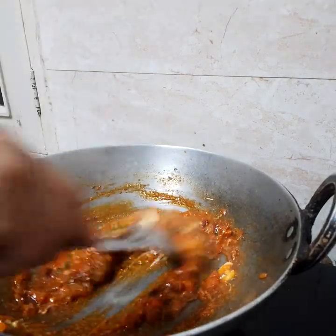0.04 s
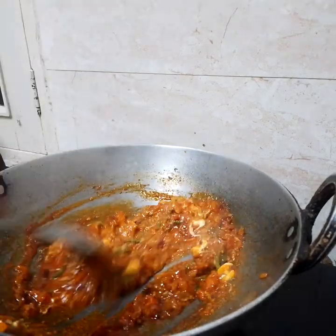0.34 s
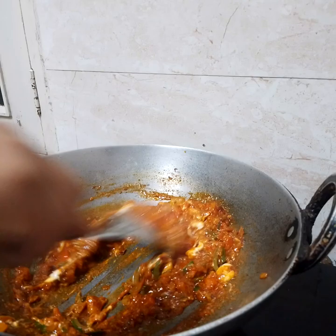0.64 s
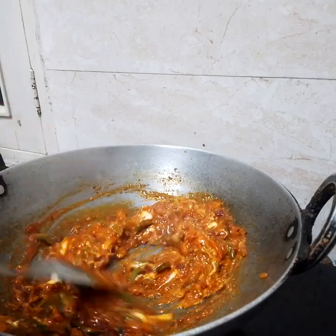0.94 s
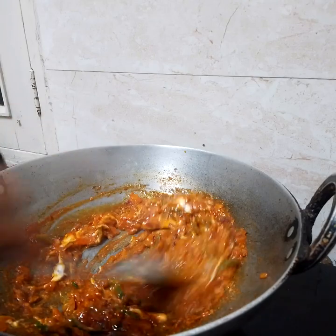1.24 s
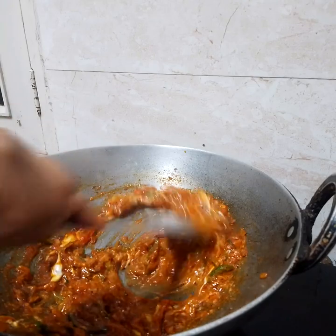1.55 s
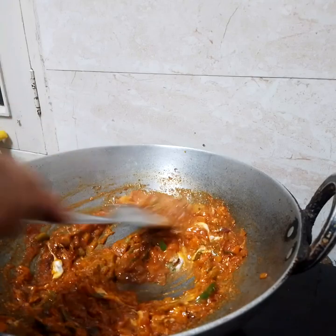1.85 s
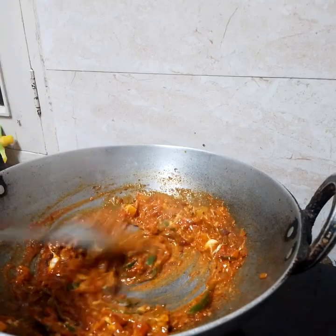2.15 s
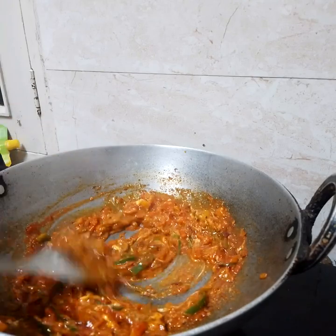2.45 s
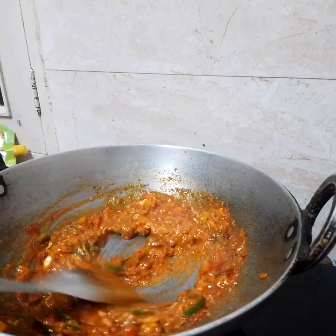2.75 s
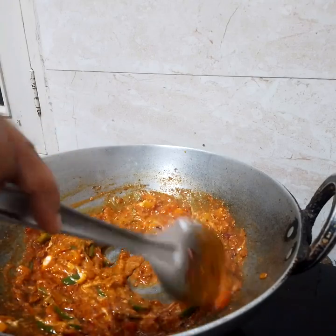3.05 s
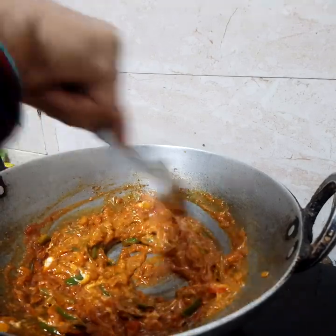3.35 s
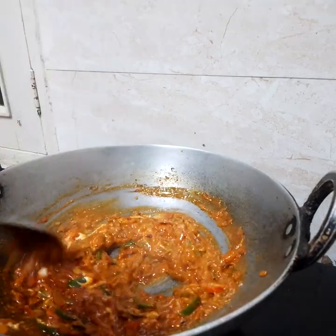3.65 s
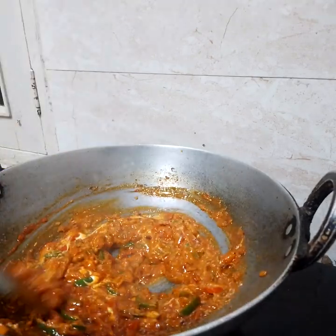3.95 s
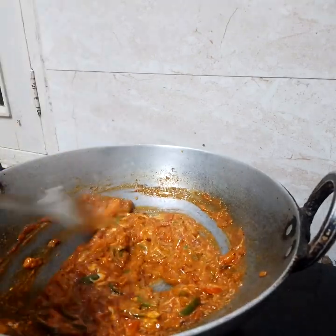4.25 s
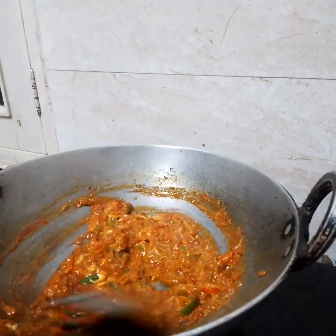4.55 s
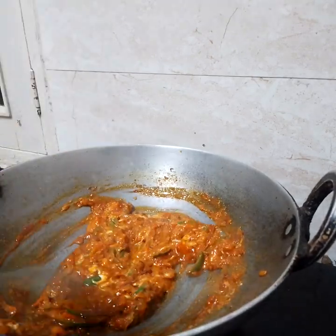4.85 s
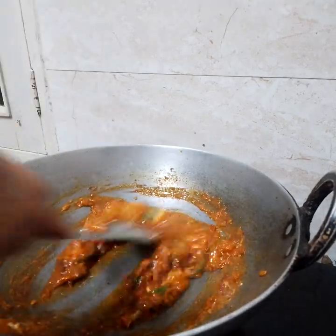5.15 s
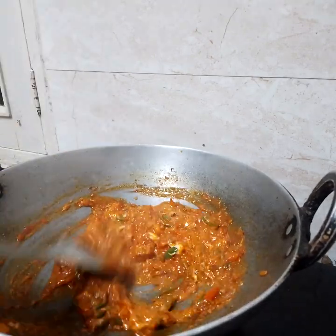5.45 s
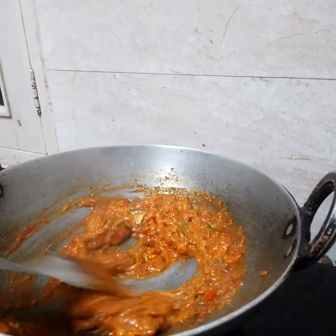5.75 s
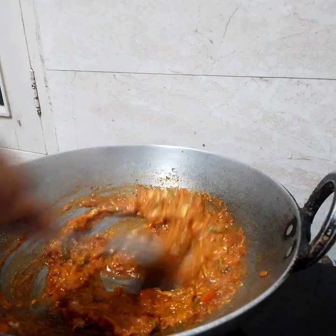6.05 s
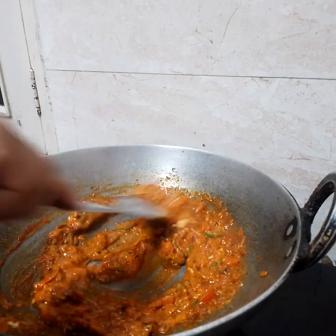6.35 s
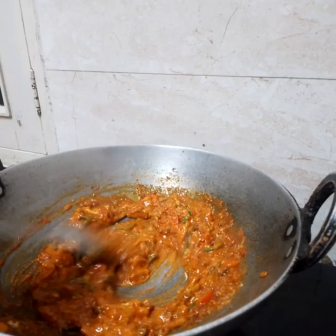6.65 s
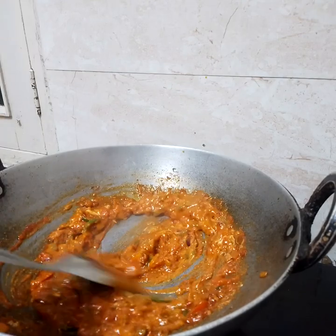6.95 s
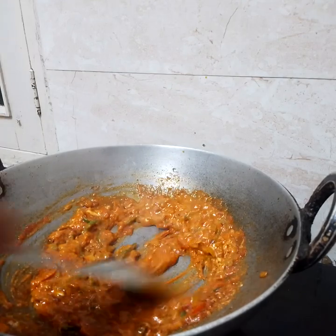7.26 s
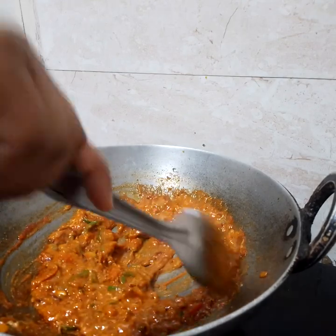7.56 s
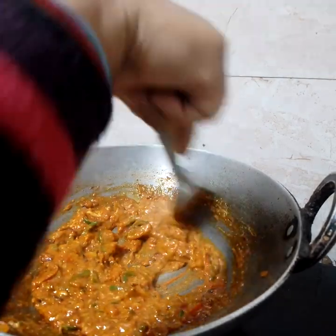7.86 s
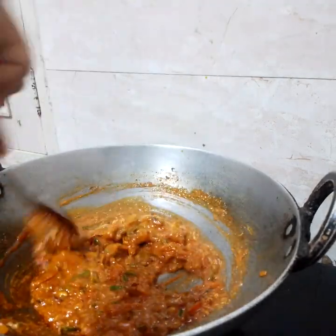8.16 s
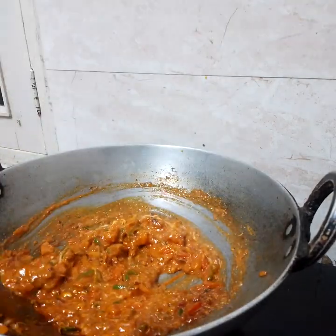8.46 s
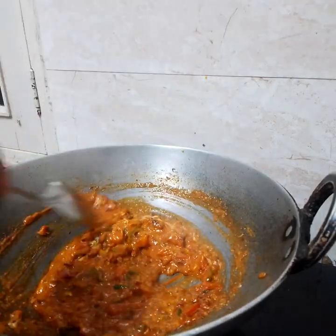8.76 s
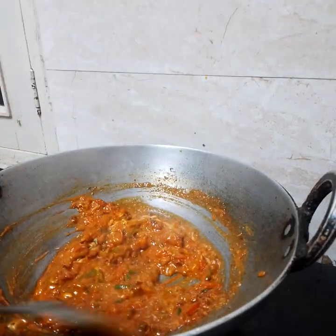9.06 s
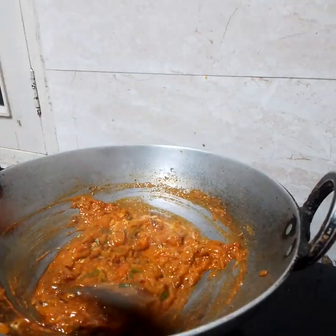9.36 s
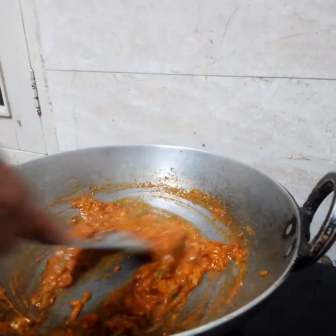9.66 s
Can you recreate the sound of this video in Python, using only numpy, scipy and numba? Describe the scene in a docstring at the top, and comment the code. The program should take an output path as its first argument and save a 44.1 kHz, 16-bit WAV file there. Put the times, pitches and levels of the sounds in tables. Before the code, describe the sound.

In a small tiled kitchen, a steel spoon rasps again and again across a metal pan, heard from close by. Thick sauce dulls the metal's ring and squelches softly as it folds over. Light clinks and brief judders break up the quick, uneven scraping, and the loudest knocks come late, ringing briefly while the stirring carries on. The walls echo slightly, and an appliance hums very faintly underneath.

```python
"""In a small tiled kitchen, a steel spoon stirs thick sauce in a metal pan close by.
Each stroke is a stream of tiny slips: the spoon's edge rasps, the pan rings, muffled by the sauce,
and the sauce squelches behind the spoon. Now and then the spoon knocks on the pan or judders across it,
and a knock or rub sets one note ringing. The walls echo, and a faint appliance hum lies underneath."""
import sys
import numpy as np
from scipy import signal
from scipy.fft import rfft, irfft
from scipy.io import wavfile
from scipy.ndimage import map_coordinates
from numba import njit

SR = 44100
rng = np.random.default_rng(int(sys.argv[2]) if len(sys.argv) > 2 else 0)


def store_wav(level_fs):
    """Save 16-bit WAV to argv[1]."""
    pcm = np.round(np.clip(np.atleast_2d(level_fs), -1, 1) * 32767)
    wavfile.write(sys.argv[1], SR, pcm.T.astype(np.int16))


N = 437472
TIME = np.arange(N) / SR
HAND_TIME = np.arange(0, N / SR, .001)  # a coarser clock for the hand's movements
FREQ = np.maximum(np.fft.rfftfreq(4096, 1 / SR), 1)

# Table levels are relative: the functions below turn them up or down.
# tone of the kitchen air: pitch_hz, level_db
AIR_TONE = [(20, 14), (55, -13), (100, 2), (170, -16), (400, 1), (1000, -6.5), (3000, -15), (7000, -3),
            (15000, -19)]
# notes of the appliance hum: pitch_hz, level_db
HUM_NOTES = [(80.7, -94), (118.4, -99)]
# the spoon knocks on the pan: start_s, edge_db, body_db, thud_db, ring_db
KNOCKS = [(0.023, -53, -69, -74, -85), (0.047, -49, -73, -85, -90), (0.572, -59, -55, -49, -85),
          (0.611, -41, -34.5, -67, -64), (1.248, -39, -49, -56, -76), (1.588, -26.5, -35, -69, -60),
          (1.681, -32, -41, -66, -70), (2.005, -48, -40.5, -71, -66), (2.263, -42.5, -40, -75, -67),
          (2.342, -43, -47, -49, -76), (2.708, -37.5, -64, -54, -63), (3.037, -22, -52, -52, -68),
          (3.053, -21.5, -34, -36.5, -65), (3.157, -39, -23, -68, -38), (3.276, -22, -30, -44, -38),
          (3.377, -40, -66, -51, -73), (3.462, -45, -36, -44, -68), (4.542, -76, -38, -112, -65),
          (4.608, -31.5, -35, -77, -45.5), (4.855, -32, -31, -63, -65), (5.255, -40, -34, -47, -47),
          (5.743, -32, -43, -56, -61), (6.041, -45, -49, -75, -55.5), (6.111, -30, -39, -43, -62),
          (6.525, -40, -54, -71, -73), (6.837, -34, -63, -70, -49), (7.209, -53, -32.5, -35, -42),
          (7.681, -32.5, -37, -58, -67), (7.738, -45, -24.5, -59, -44), (7.773, -42, -21, -44, -48),
          (8.031, -15, -24.5, -41, -53), (8.040, -11.5, -19.5, -43, -33), (8.441, -15.5, -19.5, -38, -50),
          (8.991, -32, -25, -64, -33), (9.116, -33, -30.5, -71, -51), (9.266, -18, -18, -39, -50),
          (9.685, -44, -34, -35, -54), (9.786, -27.5, -65, -71, -63)]
# overall tone of the pan: pitch_hz, left_db, right_db
PAN_TONE = [(173, -52, -42.5), (236, -23.5, -20.5), (514, -20.5, -19.5), (632, -8, 0), (787, -3.5, -3.5),
            (1240, -2.5, 1.5), (2260, 1.5, 2), (3780, 0, -1), (4600, 1, 0.5), (6200, 7, 4), (7270, 6, 2),
            (8690, -5, 2), (8950, -1, -4.5), (11090, -21.5, -20.5), (13200, -16, -19.5),
            (15600, -56, -40.5)]
# muffled pan notes that stand out from that tone: pitch_hz, width_hz, left_db, right_db
PAN_NOTES = [(293.5, 5, 16, 10), (378, 24, 10, 6), (507, 17.4, -6.5, 4), (708, 9.9, -2, -0.5),
             (1467, 270, -2, -7), (3130, 210, -7.5, -17), (4010, 180, -2, -7), (4360, 92, -0.5, -24),
             (5050, 330, -16, -3.5), (6510, 160, -7, -10), (6750, 430, 0, -20), (7420, 170, 0, 0),
             (8330, 190, -1, -10), (8570, 71, -15, -10.5), (10050, 1030, -3, 6), (11070, 150, 8, 12.5)]
# notes that ring on when the spoon bounces clear: pitch_hz, level_db, fade_s (time to drop 60 dB)
TAP_NOTES = [(905, -2, 0.3), (1084, 6.5, 0.47), (2152, 11, 0.053), (2340, 19, 0.19), (3050, 16, 0.2),
             (3206, 1, 0.17), (4050, 5, .26), (4770, -12, .3), (5830, -3, 0.146), (6230, -8, 0.49),
             (6800, -5, 0.38)]
# notes of the spoon on bare metal: pitch_hz, width_hz, level_db
BARE_NOTES = [(990, 87, -3), (1500, 70, -11), (2120, 57, -4), (2440, 96, 1.5), (2860, 62, -7),
              (3250, 170, 8.5), (4170, 390, 0), (4500, 260, 3), (6260, 110, 8), (7700, 780, -2.5)]
# the spoon skims bare metal: start_s, end_s, level_db
SKIMS = [(2.705, 2.775, -53.5), (2.769, 2.897, -39), (7.212, 7.312, -55), (7.27, 7.364, -45.5),
         (7.336, 7.41, -50)]
# spoon strokes; the hollow is the gap under the spoon, and its pitch is given at full pressure:
# start_s, rise_s, hold_s, edge_db, body_db, sauce_db, hollow_hz, glide_octaves_per_s
STROKES = [(0.185, 0.045, 0.005, -24.5, -38.5, -54, 1690, -8),
           (0.607, 0.057, 0.0042, -28.5, -38, -69, 1970, -8),
           (0.942, 0.092, 0.013, -29.5, -40, -57.5, 2220, -5),
           (1.215, 0.042, 0.0049, -49, -57, -70, 1110, -17),
           (1.341, 0.076, 0.04, -29, -35.5, -63.5, 1950, -17),
           (1.58, 0.012, 0.0052, -33, -55, -66, 1840, -4),
           (1.681, 0.081, 0.049, -27, -34, -62.5, 2200, -7.5),
           (2.037, 0.11, 0.0094, -29.5, -37.5, -68, 1690, -3.5),
           (2.41, 0.061, 0.0047, -32, -35, -62, 2260, -3.5),
           (2.788, 0.059, 0.13, -32, -47, -68, 2950, -9.5), (3.02, 0.022, 0.0052, -32.5, -32, -53, 1200, 4),
           (3.094, 0.081, 0.076, -28.5, -32, -52.5, 1590, -3),
           (3.461, 0.11, 0.032, -43.5, -35.5, -80, 865, 6),
           (3.578, 0.11, 0.057, -25.5, -37.5, -54.5, 1680, -4.5),
           (3.849, 0.057, 0.1, -25.5, -33, -55.5, 2490, 2),
           (4.104, 0.14, 0.017, -21.5, -30.5, -52.5, 2070, 4),
           (4.602, 0.092, 0.0099, -27, -40, -51.5, 1820, 2),
           (4.85, 0.0096, 0.0065, -40.5, -47.5, -70, 810, -15),
           (5.036, 0.069, 0.052, -30, -33.5, -58.5, 2060, -1.5),
           (5.251, 0.028, 0.059, -30, -50, -69, 1580, -12),
           (5.431, 0.079, 0.03, -25, -31.5, -61.5, 2190, -14),
           (5.82, 0.047, 0.005, -34.5, -44, -56, 1660, -9),
           (5.896, 0.04, 0.015, -40.5, -39, -65, 1080, -17),
           (6.098, 0.024, 0.018, -37.5, -50, -64.5, 1750, 3),
           (6.211, 0.084, 0.048, -26, -31, -72, 1840, -8.5),
           (6.366, 0.039, 0.021, -42, -39, -77, 800.0, -11),
           (6.496, 0.036, 0.15, -63.5, -55.5, -63, 700.0, 7.5),
           (6.63, 0.069, 0.0055, -28, -32.5, -61.5, 2090, -3),
           (6.828, 0.0093, 0.0044, -35, -53, -79, 1290, -14),
           (6.982, 0.045, 0.025, -29, -35, -57, 2340, -5),
           (7.348, 0.036, 0.16, -41, -53.5, -72, 2730, -5.5), (7.58, 0.08, 0.081, -53, -73, -76, 1960, 0),
           (7.671, 0.067, 0.052, -30, -32.5, -52.5, 1300, -2),
           (8.028, 0.0027, 0.042, -27, -35, -55, 2720, -3),
           (8.09, 0.027, 0.086, -37.5, -36.5, -63, 2100, -8),
           (8.17, 0.023, 0.082, -22.5, -30.5, -61.5, 1940, -1.5),
           (8.372, 0.024, 0.11, -26.5, -31.5, -54, 2660, -4),
           (8.543, 0.025, 0.25, -36, -36, -67.5, 1800, 1), (8.683, 0.1, 0.038, -22.5, -34, -53, 1950, -3.5),
           (8.896, 0.035, 0.13, -33.5, -39.5, -55, 2196, 0),
           (9.141, 0.033, 0.11, -21.5, -37.5, -54.5, 2250, -2),
           (9.339, 0.042, 0.13, -31.5, -48, -67, 1020, 0.5),
           (9.55, 0.082, 0.063, -25.5, -34.5, -53.5, 2700, -9.5),
           (9.838, 0.019, 0.042, -33.5, -41, -59, 710, -10)]
# the edge bites through to the metal: centre_s, length_s, low_pitch_hz, low_db, middle_db, high_db
BITES = [(0.244, 0.042, 1550, -38, -66, -30), (0.654, 0.043, 1470, -45, -58, -38),
         (1.019, 0.12, 1410, -36, -28.5, -32), (1.406, 0.11, 1420, -32.5, -36, -31),
         (1.756, 0.08, 1460, -44, -45, -33.5), (2.134, 0.072, 1440, -37, -46, -33),
         (2.465, 0.13, 1530, -37.5, -58, -38), (3.205, 0.13, 1460, -39, -52, -44),
         (3.672, 0.36, 1510, -36, -39, -48), (3.874, 0.072, 1380, -38, -35, -50),
         (3.95, 0.23, 1410, -34.5, -41, -55), (4.264, 0.041, 1470, -53, -54, -36),
         (5.1, 0.072, 1430, -60, -34, -35.5), (5.476, 0.059, 1440, -42, -31, -45),
         (5.549, 0.07, 1530, -31, -43, -55), (6.302, 0.091, 1580, -37, -42, -43),
         (6.686, 0.12, 1700, -39, -40, -31), (7.052, 0.076, 1530, -46, -42, -35.5),
         (7.755, 0.074, 1480, -35, -58, -53), (8.236, 0.13, 1490, -31, -46, -36),
         (8.415, 0.16, 1430, -35, -35, -48), (8.797, 0.075, 1600, -50, -52, -49),
         (9.23, 0.053, 1460, -50, -49, -37), (9.27, 0.062, 1450, -30, -54, -30),
         (9.647, 0.059, 1720, -49, -49, -27)]
# a bite's low, middle and high note: width_hz
BITE_WIDTHS = [240, 380, 640]
# the spoon judders across the pan: start_s, end_s, level_db
JUDDERS = [(0.32, 0.5, -64), (1.044, 1.206, -67.5), (1.763, 1.94, -69), (2.498, 2.684, -63),
           (3.277, 3.386, -67.5), (3.943, 4.14, -59.5), (4.202, 4.314, -59.5), (4.735, 4.887, -57.5),
           (5.473, 5.584, -71), (8.777, 8.89, -61), (9.223, 9.46, -61.5), (9.66, 9.86, -57)]
# tone of the judder: pitch_hz, level_db
JUDDER_TONE = [(40, -38), (85, -4.5), (120, -4), (165, -18), (240, 0.5), (330, 2), (500, -41), (1500, -44)]
# the sauce folds over: start_s, length_s, level_db
FOLDS = [(0.567, 0.15, -57.5), (0.703, 0.019, -63), (2.932, 0.15, -59), (3.362, 0.023, -64),
         (3.483, 0.062, -53.5), (4.53, 0.035, -65.5), (4.718, 0.12, -52.5), (5.258, 0.041, -54.5),
         (5.908, 0.08, -54), (6.386, 0.024, -55), (6.844, 0.015, -62), (7.028, 0.078, -51.5),
         (7.645, 0.052, -54.5), (8.535, 0.014, -58), (8.768, 0.032, -46), (9.254, 0.083, -45),
         (9.68, 0.15, -52)]
# a knock or rub sets one note of the pan ringing briefly: start_s, drive_s, pitch_hz, level_db
PAN_RINGS = [(0.573, 0.063, 365, -49), (0.715, 0.034, 727, -53), (1.09, 0.079, 714, -69),
             (3.032, 0.012, 1144, -31.5), (3.93, 0.16, 1488, -49), (3.97, 0.09, 2616, -44),
             (4.31, 0.16, 685, -61.5), (4.606, 0.006, 2390, -42), (4.87, 0.17, 703, -63.5),
             (5.26, 0.071, 726, -51), (6.395, 0.05, 681, -47), (6.47, 0.048, 730, -62),
             (6.595, 0.017, 1066, -54.5), (6.634, 0.0067, 2420, -37), (8.029, 0.041, 371, -45),
             (8.029, 0.0059, 2846, -26), (9.135, 0.13, 507, -50), (9.845, 0.11, 790, -47)]


def undb(db):
    """Turn decibels into a gain, the number a sound is multiplied by."""
    return 10 ** (np.asarray(db) / 20)


def unit(x):
    """Scale a signal to an average strength (rms) of 1."""
    return x / np.sqrt(np.mean(x ** 2))


def wander(rate):
    """A smooth random drift, about 1 in size, that turns about `rate` times a second."""
    points = signal.resample(rng.standard_normal(4096), 32768)
    return np.interp(TIME * rate * 8, np.arange(len(points)), points)


def tone_curve(table, column=1):
    """Read one level column of a tone table as a gain at each pitch in FREQ."""
    table = np.array(table)
    return undb(np.interp(np.log(FREQ), np.log(table[:, 0]), table[:, column]))


def apply_tone(x, curve):
    """Filter a sound with a tone curve."""
    cepstrum = irfft(np.log(curve + 1e-6))
    half = len(cepstrum) // 2
    cepstrum[1:half] *= 2  # these two lines put all ringing after a hit, never before it
    cepstrum[half + 1:] = 0
    return signal.oaconvolve(x, irfft(np.exp(rfft(cepstrum))))[:N]


@njit
def resonance(x, hz, width):
    """A filter with a moving pitch: row 0 keeps the sound near `hz`, row 1 the sound above it."""
    out, band_state, low_state = np.empty((2, len(x))), 0., 0.
    for i in range(len(x)):
        step, damping = np.tan(np.pi * hz[i] / SR), width[i] / hz[i]
        band = (band_state + step * (x[i] - low_state)) / (1 + step * (step + damping))
        out[0, i] = damping * band
        out[1, i] = x[i] - damping * band - low_state - step * band
        band_state, low_state = 2 * band - band_state, low_state + 2 * step * band
    return out


def slips(rate, spread_db):
    """Rubbing as tiny random clicks of uneven size, about `rate` a second."""
    size = undb(spread_db * np.clip(rng.standard_normal(N), -2, 2))
    return unit((rng.random(N) < rate / SR) * size * rng.choice([-1, 1], N))


def arch(start, end):
    """A rounded swell from 0 to 1 and back between two times."""
    return np.sqrt(np.sin(np.pi * np.clip((TIME - start) / (end - start), 0, 1)).clip(0))


def together(gains, lag_s=0):
    """Add the power of overlapping pushes, giving one gain per sample."""
    return np.interp(TIME - lag_s, HAND_TIME, np.linalg.norm(gains, axis=0))


def air_and_hum():
    """Still kitchen air hisses softly, and an appliance gives a low, slightly wavering hum."""
    shared, *sides = [unit(apply_tone(rng.standard_normal(N), tone_curve(AIR_TONE))) for _ in range(3)]
    hum = sum(undb(db + wander(1.5)) * np.sin(2 * np.pi * hz * TIME) for hz, db in HUM_NOTES)
    return undb(-78) * (1.5 * shared + 2.0 * np.array(sides)) + np.sqrt(2) * hum


def knocks(chatter=0.046, chatter_s=0.0096):
    """Each knock is a sharp push and a brief chatter of steel on metal; rows are edge, body and thud."""
    out = np.zeros((3, N + SR))
    age = np.arange(SR // 40) / SR
    for start_s, *levels, _ in KNOCKS:
        push = chatter * rng.standard_normal(len(age)) * np.exp(-age / chatter_s)
        push[0] += .5
        push *= np.sqrt(SR / 200 / np.sum(push ** 2))  # as much energy as 5 ms at strength 1
        start = int(start_s * SR)
        out[:, start:start + len(age)] += undb(levels)[:, None] * push
    return out[:, :N]


def pan(edge, body, sauce, edge_hz=2700, body_hz=620, sauce_hz=850, wander_db=4):
    """The pan shapes all three pushes; its notes grow and shrink as the spoon touches other spots."""
    below_edge = 1 / (1 + (FREQ / edge_hz) ** 8)
    below_sauce = 1 / (1 + (FREQ / sauce_hz) ** 8)
    middle = below_edge / (1 + (body_hz / FREQ) ** 8)
    bands = np.sqrt([1 - below_edge, middle, below_sauce])  # edge high, body in the middle, sauce low
    sides = np.array([tone_curve(PAN_TONE, column=1), tone_curve(PAN_TONE, column=2)])
    broad = np.zeros((2, N))
    for push, band in zip((edge, body, sauce), bands):
        broad += [apply_tone(push, curve) for curve in unit(sides * band)]
    out = broad.copy()
    for hz, width, left_db, right_db in PAN_NOTES:
        ring = signal.lfilter(*signal.iirpeak(hz, hz / width, fs=SR), broad)
        out += ring * undb([[left_db], [right_db]]) * undb(wander_db * wander(5))
    return out


def taps(gain_db=-2, scatter_db=3):
    """After a knock the metal rings on; each spot favours different notes."""
    out = np.zeros((2, N + SR))
    age = np.arange(SR // 3) / SR
    hz, db, fade_s = np.array(TAP_NOTES).T[:, :, None]
    notes = np.sin(2 * np.pi * hz * age) * undb(db - 60 * age / fade_s)
    for start_s, *_, ring_db in KNOCKS:
        strength, flip = rng.standard_normal((2, 2, len(hz)))
        ring = (undb(scatter_db * strength) * np.sign(flip)) @ notes
        start = int(start_s * SR)
        out[:, start:start + len(age)] += undb(ring_db + gain_db) * ring / np.std(ring[:, :SR // 200])
    return out[:, :N]


def bare_metal(skim_db=6, clink_db=17, right_lag_s=0.00008):
    """Knocks clink and skims scrape on bare metal, sounding a few strong notes."""
    swell = sum(undb(db) * arch(start, end) for start, end, db in SKIMS)
    push = undb(skim_db) * slips(rate=3300, spread_db=3) * swell
    for start_s, *_, ring_db in KNOCKS:
        push[int(start_s * SR)] += undb(ring_db + clink_db) * np.sqrt(SR / 200)
    out = np.zeros(N)
    for hz, width, db in BARE_NOTES:
        band = signal.iirpeak(hz, hz / width / 2, fs=SR)
        out += undb(db) * signal.lfilter(*band, signal.lfilter(*band, push))
    return np.array([out, np.interp(TIME - right_lag_s, TIME, out)])


def echoes(fade_s, treble_fade_s, bass_hz=620, treble_hz=3500):
    """A dense tail of echoes that drops 60 dB in the fade time; left and right share the bass."""
    def keep(x, kind, hz):
        return signal.sosfilt(signal.butter(3, hz, kind, fs=SR, output="sos"), x)

    age = np.arange(SR // 2) / SR
    noise = rng.standard_normal((3, len(age)))
    noise = keep(noise[0], "low", bass_hz) + keep(noise[1:], "high", bass_hz)
    tail = keep(noise, "low", treble_hz) * undb(-60 * age / fade_s)
    tail += keep(noise, "high", treble_hz) * undb(-60 * age / treble_fade_s)
    return unit(tail) / np.sqrt(len(age))


def kitchen(x, direct_db=-7, bowl_db=-4, room_db=-7, lag_s=0.00021, spots=5):
    """The pan's bowl and the tiled walls echo differently from each spot that the spoon passes."""
    lag = lag_s * SR * wander(5) / 2  # the direct sound shifts between left and right
    direct = [map_coordinates(side, [np.arange(N) + sign * lag]) for side, sign in zip(x, (1, -1))]
    nearness = np.exp([wander(9) for _ in range(spots)])
    out = undb(direct_db) * np.array(direct)
    for share in nearness / np.linalg.norm(nearness, axis=0):
        bowl = undb(bowl_db) * echoes(fade_s=0.024, treble_fade_s=0.031)
        walls = undb(room_db) * echoes(fade_s=0.35, treble_fade_s=0.3)
        out += signal.oaconvolve(x * share, bowl + walls, axes=1)[:, :N]
    return out


def pressure(start, rise, hold, curve=1.4, touch_share=0.15, touch_s=0.0034):
    """One push lands, presses harder, eases while held, then lifts and leaves a faint wet drag."""
    ease_db_per_s, lift_db_per_s, drag_db_per_s, drag_db = 14.5, 340, 100, -23
    age = HAND_TIME - start
    landing = touch_share * np.clip(age / touch_s, 0, 1)
    pressing = (1 - touch_share) * np.clip(age / rise, 0, 1) ** curve
    easing = undb(-ease_db_per_s * np.clip(age - rise, 0, hold))
    lifted_s = np.maximum(age - rise - hold, 0)
    leaving = undb(-lift_db_per_s * lifted_s) + undb(drag_db - drag_db_per_s * lifted_s)
    return (landing + pressing) * easing * leaving


def strokes(lowest_hz=630, highest_hz=2700):
    """The hand's pushes set the gains of edge, pan body and sauce, and the pitch of the hollow."""
    edge, body, sauce, octaves = [], [], [], []
    for start, rise, hold, edge_db, body_db, sauce_db, hollow_hz, glide in STROKES:
        push = pressure(start, rise, hold)
        edge.append(push * undb(edge_db))
        body.append(pressure(start, rise, hold, curve=1.6) * undb(body_db))  # needs a harder push
        sauce.append(push * undb(sauce_db))
        # the hollow opens during most strokes, so its pitch falls
        octaves.append(np.log2(hollow_hz) + glide * (HAND_TIME - start - rise))
    pitches = np.clip(2 ** np.array(octaves), lowest_hz, highest_hz)
    hz = np.average(pitches, axis=0, weights=np.square(body) + 1e-18)  # the loudest stroke leads
    return (together(edge), together(body, lag_s=0.00072), together(sauce, lag_s=0.049),
            np.interp(TIME, HAND_TIME, hz))


def catches(rate, release_s, spread_db):
    """The spoon's grip breaks loose at random moments; each catch starts at once and dies away."""
    breaks = (rng.random(N) < rate / SR) * undb(spread_db * np.clip(rng.standard_normal(N), -2, 2))
    return unit(signal.lfilter([1], [1, -np.exp(-1 / (release_s * SR))], breaks))


def scrape(hollow_hz, upper_ratio=1.965, cut_ratio=0.56):
    """The edge rasps and coarser slips shake the pan; both sound through the hollow under the spoon."""
    grip = unit(3.5 + 0.39 * catches(rate=210, release_s=0.0019, spread_db=1))
    edge = slips(rate=4000, spread_db=3.5) * grip
    body = slips(rate=3000, spread_db=5.5) * grip
    ticks = 0.51 * slips(rate=170, spread_db=4.5)  # bits of food snap under the edge
    edge, body = edge + ticks, body + ticks
    upper_hz = upper_ratio * hollow_hz * np.exp(0.15 * wander(4))  # the hollow's second note
    edge_upper = resonance(edge, upper_hz, width=0.14 * upper_hz)[0]
    body_upper = resonance(body, upper_hz, width=0.14 * upper_hz)[0]
    hollow = resonance(body, hollow_hz, width=0.37 * hollow_hz)[0]
    body = undb(-7) * body + undb(3) * hollow + undb(-4) * body_upper
    cut_hz = cut_ratio * hollow_hz  # little sound gets out below the hollow's first note
    return unit(edge + undb(-2) * edge_upper), resonance(body, cut_hz, width=cut_hz)[1]


def squelch(pop_share=0.23, cycles=9, glide=0.31, count=900):
    """Sauce tears wetly off the metal, and small air pockets pop with a rising pitch."""
    pops = np.zeros(N + SR)
    for when, pitch, size in rng.random((count, 3)):
        hz = 280 * 3 ** pitch
        age = np.arange(int(2 * cycles * SR / hz)) * hz / SR  # in cycles
        chirp = np.sin(2 * np.pi * age * (1 + glide * age / cycles / 2))
        start = int(when * N)
        pops[start:start + len(age)] += (0.61 + size) * np.exp(-3 * age / cycles) * chirp
    return 1.15 * slips(rate=900, spread_db=4) + pop_share * unit(pops[:N])


def bites(middle_hz=2560, high_hz=4140, drift=0.04):
    """Pressed hard, the edge bites the metal and sounds three gritty notes that drift as it moves."""
    centre_s, length_s, low_hz, *levels = np.array(BITES).T
    progress = (HAND_TIME - centre_s[:, None]) / length_s[:, None]
    swells = np.cos(np.pi * np.clip(progress, -.5, .5)) ** 2
    pitches = np.interp(TIME, centre_s, low_hz), middle_hz, high_hz
    friction = slips(rate=1500, spread_db=5.5)
    out = np.zeros(N)
    for pitch_hz, width_hz, db in zip(pitches, BITE_WIDTHS, levels):
        hz = pitch_hz * np.exp(drift * wander(6))
        width = np.full(N, float(width_hz))
        ring = resonance(resonance(friction, hz, width)[0], hz, width)[0]
        out += unit(ring) * together(swells * undb(db)[:, None])
    return out


def judder(thumps_per_s=90, uneven=0.67, gain_db=3):
    """The spoon sticks and slips in uneven thumps that rock the whole pan."""
    thump_count = np.floor(np.cumsum(thumps_per_s * np.exp(uneven * wander(51))) / SR)
    thumps = np.diff(thump_count, prepend=0) * undb(wander(59))
    swell = sum(undb(db) * arch(start, end) for start, end, db in JUDDERS)
    return unit(apply_tone(thumps, tone_curve(JUDDER_TONE))) * swell * undb(gain_db)


def folds(rise_s=0.0082):
    """The gain of the squelch swells quickly as the sauce folds over and falls back."""
    return together([undb(db) * pressure(start, rise_s, length) for start, length, db in FOLDS])


def pan_rings(rise_s=0.0051, fade_s=0.18, rough=0.48):
    """A knock or rub sets one note of the pan ringing briefly; the note trembles and dies away."""
    # a complex number, so that both the strength and the timing of the wave tremble
    tremble = (1 + rough * (wander(110) + 1j * wander(110))) / np.sqrt(1 + 2 * rough ** 2)
    notes = np.zeros(N)
    for start, drive_s, hz, db in PAN_RINGS:
        span = slice(int(start * SR), int(start * SR) + SR // 2)
        age = TIME[span] - start
        swell = np.clip(age / rise_s, 0, 1) * undb(db - 60 * np.maximum(age - drive_s, 0) / fade_s)
        notes[span] += swell * np.imag(tremble[span] * np.exp(2j * np.pi * hz * age))
    return np.sqrt(2) * notes


def scene(edge_db=-3, body_db=-4.5, knock_db=-2.5):
    """Strokes, sauce and knocks sound through the pan and join its other noises in the kitchen."""
    edge_gain, body_gain, sauce_gain, hollow_hz = strokes()
    edge, body = scrape(hollow_hz)
    sauce = squelch() * np.hypot(sauce_gain, folds())
    edge, body, sauce = np.array([edge * edge_gain, body * body_gain, sauce]) + undb(knock_db) * knocks()
    stirring = pan(edge * undb(edge_db), body * undb(body_db), sauce)
    return kitchen(stirring + bites() + bare_metal() + taps() + judder() + pan_rings()) + air_and_hum()


def record(dry, top_hz=15800):
    """The phone cuts off the highest treble."""
    return signal.sosfilt(signal.ellip(8, .2, 70, top_hz, fs=SR, output="sos"), dry)


dry = scene()
out = record(dry)
store_wav(out)
```